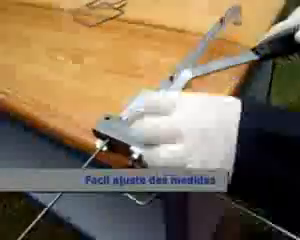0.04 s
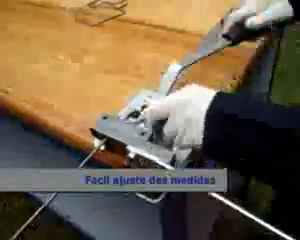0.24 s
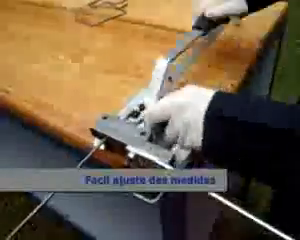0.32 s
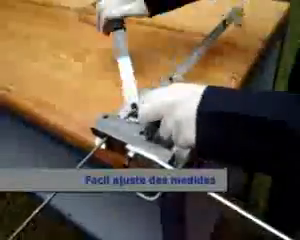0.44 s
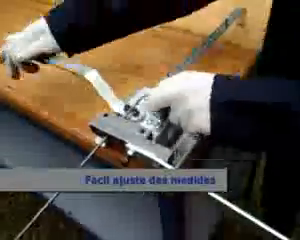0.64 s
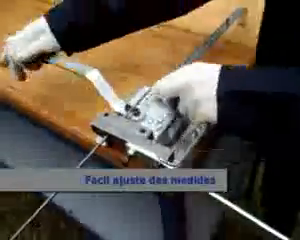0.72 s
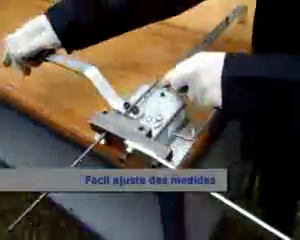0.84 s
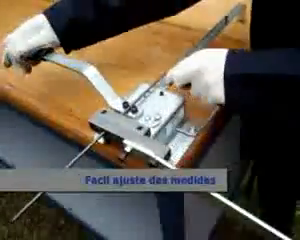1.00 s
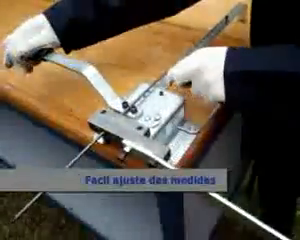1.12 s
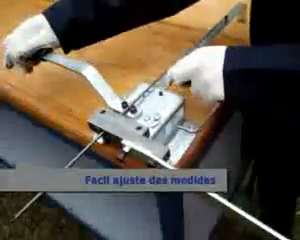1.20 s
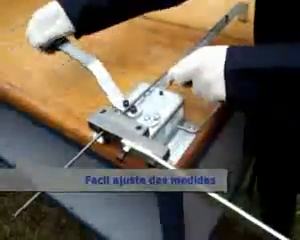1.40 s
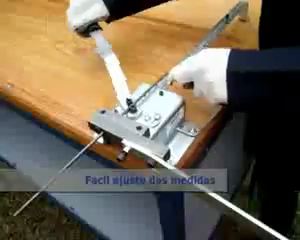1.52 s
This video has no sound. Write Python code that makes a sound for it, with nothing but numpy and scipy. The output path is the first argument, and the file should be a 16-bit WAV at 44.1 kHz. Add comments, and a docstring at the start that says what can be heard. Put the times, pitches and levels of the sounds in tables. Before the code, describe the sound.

Steel clacks and a gritty scrape as a hand lever bends a metal rod.

```python
"""Steel clacks, a short rattle, then a gritty scrape that ends in a few small groans: a hand-lever rod
bender on a wooden bench, close by, over a quiet rush of open air. The rod clinks against its guide,
knocks the bench and slides into its seat. The lever drags it round the pin, where tiny slips of rough
steel ring the tool and the bench. At low speed the pivot sticks and slips, and groans."""
import sys
import numpy as np
from scipy import signal
from scipy.fft import rfft, irfft, next_fast_len
from scipy.io import wavfile
from scipy.ndimage import map_coordinates

SR = 44100
rng = np.random.default_rng(int(sys.argv[2]) if len(sys.argv) > 2 else 0)


def wrap_up_sound(samples):
    """Save the sound to the file named by the first command line argument, as 16-bit audio."""
    columns = np.atleast_2d(samples).T
    # keep every value between -1 and 1, then stretch to whole-number steps
    tamed = np.clip(columns, -1, 1)
    steps = np.round(tamed * 32767).astype(np.int16)
    wavfile.write(sys.argv[1], SR, steps)


N = 68355

# modes of the bench with the tool bolted on: f/Hz, relative level/dB, t60/s
BENCH_MODES = [(290, -4, .07), (361, -6, .08), (468, -7, .08), (564, -3, .09), (618, -2, .07),
               (682, -2, .09), (742, -2, .09), (824, -2, .08), (876, -2, .08), (997, -1, .08),
               (1112, -9, .07), (1173, -4, .08), (1426, -5, .08), (1896, -7, .08)]
# modes of the steel parts: f/Hz, relative level/dB, t60/s
STEEL_MODES = [(1900, -9, .05), (2480, -2, .03), (2640, -3, .03), (2820, 0, .03), (3980, -5, .022),
               (4230, -1, .028), (4450, -1, .025), (5080, -7, .025), (5600, -10, .02), (6800, -8, .03),
               (7300, -8, .02), (8300, -11, .03), (9250, -11, .03), (9620, -10, .03)]


def amp(db):
    """Decibels to gain."""
    return 10 ** (np.asarray(db) / 20)


def unit(x):
    """Scale to rms 1."""
    return x / np.sqrt(np.mean(x ** 2) + 1e-20)


def clock():
    """Time of every sample in seconds."""
    return np.arange(N) / SR


def delayed(x, start_s):
    """Place x at a start time."""
    return np.pad(x, (round(start_s * SR), 0))[:N]


def along(points, hz):
    """Read (f/Hz, value) points on a log frequency axis."""
    f, v = np.transpose(points)
    return np.interp(np.log(hz + 1), np.log(f + 1), v)


def wobble(per_s):
    """A smooth random curve with per_s knots a second."""
    return map_coordinates(rng.standard_normal(2048), [clock() * per_s], mode="wrap")


def swells(rows):
    """Bell-shaped envelopes from rows of t/s, half width/s, level/dB."""
    return sum(amp(db) * np.exp(-((clock() - s) / half_s) ** 2) for s, half_s, db in rows)


def filtered(x, response):
    """Equalise x with a gain that is a function of frequency."""
    size = next_fast_len(N + SR // 2)
    return irfft(rfft(x, size) * response(np.fft.rfftfreq(size, 1 / SR)), size)[:N]


def coloured(x, eq):
    """x through a broad EQ curve, at rms 1."""
    return unit(filtered(x, lambda hz: amp(along(eq, hz))))


def emphasis(hz, centre_hz, db, octaves):
    """Favour one region by lowering the rest: where and how hard a part is touched."""
    return amp(db * (np.exp(-.5 * (np.log2((hz + 1) / centre_hz) / octaves) ** 2) - 1))


def ring(modes, weight=lambda hz: 1, scatter_db=1):
    """Damped modes set going at once, neighbours in opposite polarity."""
    hz, db, t60 = np.transpose(modes)[:, :, None]
    t = clock()[:SR // 2]
    gains = amp(db + scatter_db * rng.standard_normal(db.shape)) * weight(hz)
    polarity = (-1) ** np.arange(len(hz))[:, None]
    waves = polarity * gains * amp(-60 * t / t60) * np.sin(2 * np.pi * hz * t)
    return np.pad(waves.sum(0), (0, N - len(t))) / np.sqrt(np.sum(gains ** 2) / 2)


def slips(per_s=1800, spread_db=3):
    """Tiny irregular slips of rough steel, of unequal size."""
    ticks = (rng.random(N) < per_s / SR) * rng.choice([-1, 1], N)
    return unit(ticks * amp(spread_db * rng.standard_normal(N)))


def friction(level_db, modes, dry_db, eq):
    """Juddering slips, heard directly and through modes that wander as the contact moves."""
    judder_db, pitch_drift, drift_per_s = 1.5, .018, 22
    drive = unit(slips() * amp(-judder_db * wobble(per_s=130))) * amp(level_db)
    lag_s = pitch_drift * wobble(drift_per_s) / drift_per_s  # a moving delay bends the pitch
    resonance = signal.fftconvolve(drive, ring(modes))[:N]
    wandering = map_coordinates(resonance, [(clock() - lag_s) * SR], mode="nearest")
    rms = np.sqrt(np.mean(amp(level_db) ** 2))
    return rms * coloured(unit(wandering) + amp(dry_db) * unit(drive), eq)


def open_air():
    """A quiet, low rush of open air that wavers gently."""
    # colour of the air: f/Hz, relative level/dB
    air_eq = [(15, -79), (25, -32), (242, -5.5), (371, -8.5), (400, -2.5), (441, -11.5), (888, -8.5),
              (957, -10.5), (2600, -20), (5360, -24), (9760, -31.5), (12700, -115), (21500, -120)]
    level_db, waver_db = -45.5, 1.6
    return coloured(rng.standard_normal(N), air_eq) * amp(level_db - waver_db * wobble(per_s=6.7))


def reflections(x):
    """A faint answer from the surroundings, dying fastest in the treble."""
    # reverb time outdoors: f/Hz, t60/s
    decay_times = [(200, 0.46), (1000, 0.23), (3000, .28), (9000, 0.05)]
    hz, t, noise = signal.stft(rng.standard_normal(SR // 2), SR, nperseg=256)
    tail = signal.istft(noise * amp(-60 * t / along(decay_times, hz)[:, None]), SR, nperseg=256)[1]
    return amp(-15.5) * delayed(signal.fftconvolve(x, tail / np.linalg.norm(tail)), start_s=.012)


def bench_flex():
    """The hardest pushes flex the bench top with a dull bump."""
    # pushes through the bench top: t/s, half width/s, level/dB
    pushes = [(.459, .008, -50), (.93, .03, -56), (1.10, .03, -64)]
    # colour of a bump: f/Hz, relative level/dB
    bump_eq = [(15, -12), (40, -15), (75, 7), (130, -3), (300, -42)]
    return swells(pushes) * coloured(rng.standard_normal(N), bump_eq)


def rod_slides():
    """Light strokes of the rod along its guide: a rub in the bench under a steel hiss."""
    # strokes: peak t/s, rise/s, fall/s, hiss level/dB, rub over hiss/dB, rub centre f/Hz
    strokes = [(0.379, 0.026, .028, -41, 0, 1060), (0.578, 0.047, 0.11, -44.5, 7, 736),
               (.665, 0.028, .04, -45, 4, 660)]
    # colour of the rub: f/Hz, relative level/dB
    rub_eq = [(100, -25), (300, 7), (700, -4.5), (1100, 1), (3000, -15)]
    # colour of the hiss: f/Hz, relative level/dB
    hiss_eq = [(500, -10), (1700, -4), (2650, 3.5), (3500, -8), (4300, -9), (5500, -10), (9000, -27)]
    out, t = np.zeros(N), clock()
    for peak_s, rise_s, fall_s, db, rub_db, centre_hz in strokes:
        level_db = db - 9 * ((t - peak_s) / np.where(t < peak_s, rise_s, fall_s)) ** 2
        rub = friction(level_db + rub_db, BENCH_MODES, dry_db=-4, eq=rub_eq)
        out += unit(filtered(rub, lambda hz: emphasis(hz, centre_hz, db=11, octaves=0.12))) * rub.std()
        out += friction(level_db, STEEL_MODES, dry_db=12, eq=hiss_eq)
    return out


def pivot_groans():
    """At low speed the pivot sticks and slips unevenly in step with one mode."""
    # stick-slip groans: t/s, half width/s, level/dB
    groans = [(.838, 0.017, -28.5), (1.14, 0.022, -31.5), (1.191, 0.0073, -26), (1.259, 0.015, -29)]
    pitch_hz, pitch_waver, rough_db, octave_db = 565.5, 0.013, 2.5, -19
    phase = 2 * np.pi * np.cumsum(pitch_hz * (1 + pitch_waver * wobble(per_s=88.3))) / SR
    envelope = swells(groans) * amp(rough_db * wobble(per_s=150))
    return envelope * (np.sin(phase) + amp(octave_db) * np.sin(2 * phase))


def bench_knocks():
    """Heavier blows thud and shake the bench through a brief rough contact; the free rod rings on."""
    # blows: t/s, relative level/dB, rise/s, centre f/Hz, emphasis/dB, rod ring in the mix/dB
    blows = [(0.2229, -27.5, .003, 760, 1, -35), (0.2263, -21, 0.00032, 496, 6, 8),
             (0.478, -16.5, 0.006, 1040, 9, -3), (.533, -21, 0.0063, 670, 14, -13),
             (.763, -29, 0.0029, 940, 16, -34), (0.772, -32, 0.002, 263, 9, -25),
             (.892, -20.5, 0.0024, 480, 50, -33), (.98, -13.5, .003, 847, 24, -30),
             (1.041, -23, 0.003, 850, 35, -13)]
    # colour of the thud: f/Hz, relative level/dB
    thud_eq = [(40, -51), (150, -43.5), (280, 7), (480, -16.5), (650, -25.5), (1200, -6), (2500, -15),
               (5000, -22), (10000, -48)]
    # bending modes of the free rod: f/Hz, relative level/dB, t60/s
    rod_modes = [(280, -11, .14), (358, -12, .33), (612, 3, .085), (880, -11, .05)]
    thud_t60_s, bench_t60_s = 0.088, 0.14
    low_cut_hz = 220  # keeps the knocks light, with little deep bass
    out, t = np.zeros(N), clock()
    for start_s, db, rise_s, centre_hz, emphasis_db, rod_db in blows:
        weight = lambda hz: emphasis(hz, centre_hz, emphasis_db, octaves=0.31)
        noise = unit(filtered(coloured(rng.standard_normal(N), thud_eq), weight))
        thud = noise * amp(-60 * t / thud_t60_s)
        shake = unit(signal.fftconvolve(rng.standard_normal(N), ring(BENCH_MODES, weight))[:N])
        bench = shake * amp(-60 * t / bench_t60_s)
        rod = amp(rod_db) * ring(rod_modes)
        attack = 1 - np.exp(-t / rise_s)
        out += amp(db - 3.5) * delayed((bench + rod + thud) * attack, start_s)
    return signal.sosfilt(signal.butter(2, low_cut_hz, "high", fs=SR, output="sos"), out)


def steel_clinks():
    """Each steel contact cracks and rings, then chatters for a moment."""
    # steel on steel: t/s, level/dB, chatter decay/s, ring centre f/Hz, emphasis/dB, roll-off f/Hz
    contacts = [(0.1999, -28.5, .002, 2600, 7.5, 7500), (0.206, -26.5, 0.013, 6200, -0.5, 7300),
                (0.2182, -26.5, 0.011, 2400, 5.5, 3380), (0.4524, -17, 0.00048, 4530, 9.5, 9200),
                (.456, -24, 0.015, 9400, 12.5, 12000), (.469, -23.5, 0.0087, 4300, 8.5, 9000),
                (0.474, -25, 0.02, 2950, 4, 8800), (.513, -28, 0.014, 6840, 1, 7000),
                (0.5298, -25.5, 0.012, 2270, 17, 5070), (0.5513, -21.5, .003, 4030, 6, 8900),
                (0.886, -18.5, .001, 4400, -3.5, 6150), (.921, -22.5, 0.0012, 3300, -2.5, 8000),
                (0.9299, -14, 0.00072, 5080, 13.5, 7030), (0.9451, -16.5, 0.0014, 5000, 5, 6940),
                (1.083, -28, 0.0081, 8880, 16.5, 10100), (1.0853, -29, .003, 5050, 27, 9000),
                (1.096, -24.5, 0.0046, 1950, 17, 4000), (1.124, -31, 0.009, 2600, -1, 7060),
                (1.2633, -31.5, 0.001, 4250, 5, 9700)]
    # colour of the crack: f/Hz, relative level/dB
    crack_eq = [(40, -42), (200, 1), (900, 5), (1600, -2.5), (2700, -2), (3100, -7.5), (3500, -6.5),
                (4200, -3.5), (5200, -6.5), (7200, 0.5), (10000, -19.5)]
    rise_s, chatter_db, crack_db, shortest_crack_s = 0.00069, -1, -1.5, 0.011
    contact_t60_s = 0.12  # extra damping while the parts touch
    out, t = np.zeros(N), clock()
    attack = 1 - np.exp(-t / rise_s)
    for start_s, db, chatter_s, centre_hz, emphasis_db, dull_hz in contacts:
        rolloff = lambda hz: 1 / np.hypot(1, (hz / dull_hz) ** 4)
        weight = lambda hz: emphasis(hz, centre_hz, emphasis_db, octaves=0.15) * rolloff(hz)
        noise = unit(filtered(coloured(rng.standard_normal(N), crack_eq), weight))
        crack = noise * amp(-60 * t / (shortest_crack_s + 2 * np.pi * chatter_s))
        steel = ring(STEEL_MODES, weight)
        chatter = unit(signal.fftconvolve(slips(), steel)[:N]) * np.exp(-t / chatter_s)
        strike = steel * amp(-60 * t / contact_t60_s)
        clink = strike + amp(chatter_db) * chatter + amp(crack_db) * crack
        out += amp(db) * delayed(clink * attack, start_s)
    return out


def moving_contact(x):
    """Favour the region that the contact excites as it moves along the rod, keeping the overall level."""
    # where the weight of the scrape lies: t/s, centre f/Hz
    centres = [(.79, 450), (.85, 620), (.91, 490), (.95, 950), (1.0, 850), (1.06, 850), (1.15, 570),
               (1.28, 650)]
    hz, t, spectrum = signal.stft(x, SR, nperseg=1024)
    centre_hz = np.interp(t, *np.transpose(centres))
    spectrum *= emphasis(hz[:, None], centre_hz, db=4.5, octaves=0.66)
    swept = signal.istft(spectrum, SR, nperseg=1024)[1][:N]
    return unit(swept) * x.std()


def bending_scrape():
    """The lever drags the rod round the pin: a woody body, a steel grind and bright grit on top."""
    # the bending stroke: t/s, body level/dB, grind level/dB, grit level/dB
    stroke = [(.75, -39, -46.5, -93), (0.778, -33, -54.5, -45), (.806, -32.5, -44, -47.5),
              (0.852, -26.5, -34.5, -35.5), (0.883, -19.5, -29, -32.5), (0.912, -22.5, -27, -35.5),
              (0.934, -21, -25, -26.5), (0.99, -26.5, -28.5, -29), (1.022, -29.5, -34, -32),
              (1.06, -37, -40.5, -39), (1.10, -31, -29, -38.5), (1.134, -30, -37.5, -45),
              (1.174, -43.5, -54, -78), (1.209, -40, -44, -70), (1.272, -34.5, -46, -74),
              (1.299, -44.5, -69, -74), (1.351, -84, -67, -82)]
    # colour of the bench's body: f/Hz, relative level/dB
    body_eq = [(30, -40), (100, 1), (210, 1), (290, 3.5), (500, 2.5), (900, 1.5), (1400, 6.5), (2200, 4.5),
               (5000, -38)]
    # colour of the grind: f/Hz, relative level/dB
    grind_eq = [(300, -15), (1100, -11.5), (1800, 5.5), (2600, -1), (3500, 5), (4400, -7), (5500, -8),
                (7000, -12), (10000, -53)]
    # colour of the grit: f/Hz, relative level/dB
    grit_eq = [(2000, -34), (4000, -7), (5200, 2.5), (6300, -3), (8200, -4), (10000, -12)]
    times, *levels = np.transpose(stroke)
    body_db, grind_db, grit_db = [np.interp(clock(), times, db, left=-120, right=-120) for db in levels]
    body = moving_contact(friction(body_db, BENCH_MODES, dry_db=-3, eq=body_eq))
    grind = friction(grind_db, STEEL_MODES, dry_db=5.5, eq=grind_eq)
    grit = friction(grit_db, STEEL_MODES, dry_db=5.5, eq=grit_eq)
    return body + grind + grit


def scene():
    """The tool, the open air and the surroundings, in mono."""
    tool = steel_clinks() + bench_knocks() + bench_flex()
    tool += rod_slides() + bending_scrape() + pivot_groans()
    return (tool + open_air() + reflections(tool))[None]


def record(dry):
    """A very steep high cut takes off the top of the mix."""
    high_cut_hz = 10050
    return filtered(dry[0], lambda hz: 1 / np.sqrt(1 + (hz / high_cut_hz) ** 160))[None]


dry = scene()
out = record(dry)
wrap_up_sound(out)
```